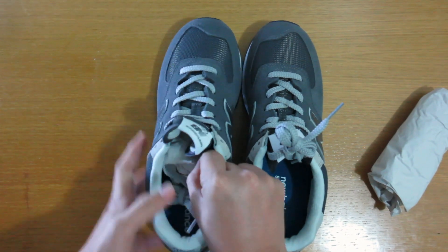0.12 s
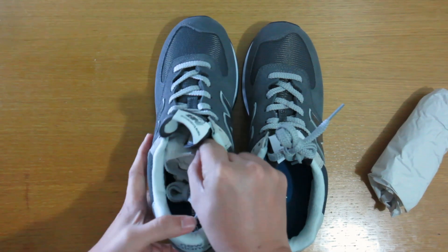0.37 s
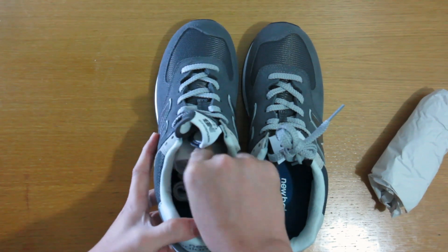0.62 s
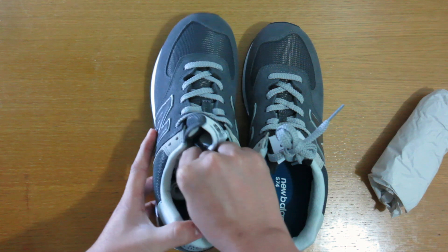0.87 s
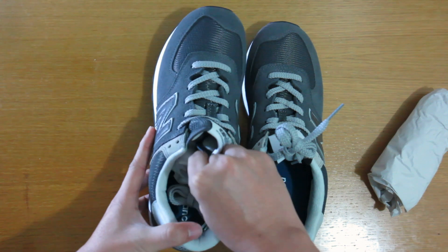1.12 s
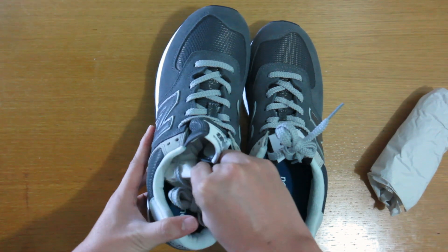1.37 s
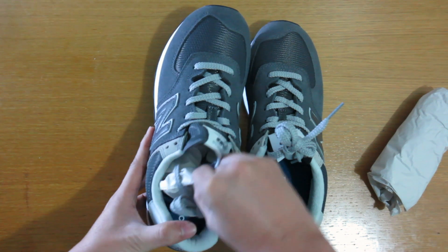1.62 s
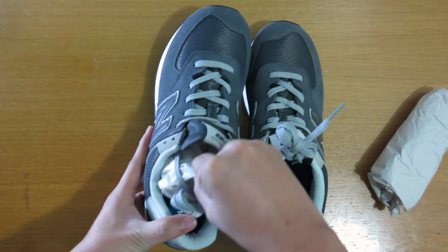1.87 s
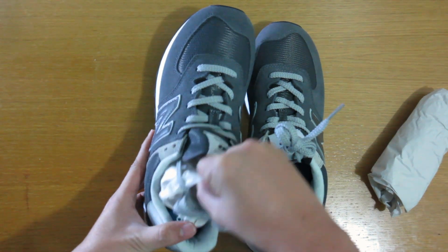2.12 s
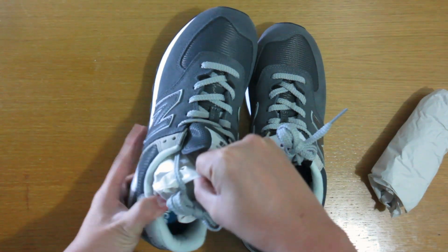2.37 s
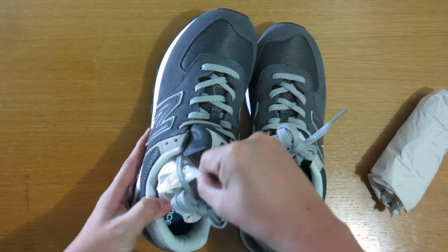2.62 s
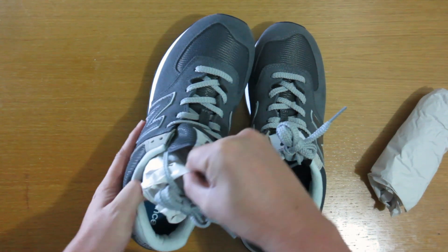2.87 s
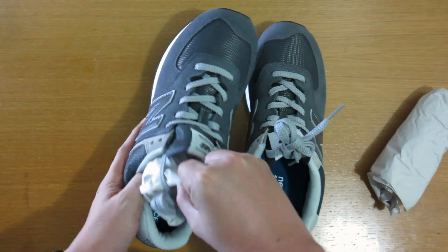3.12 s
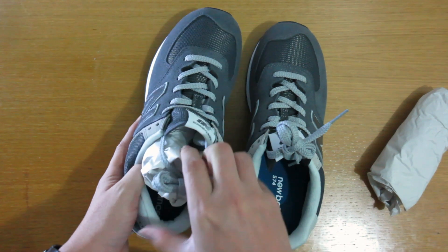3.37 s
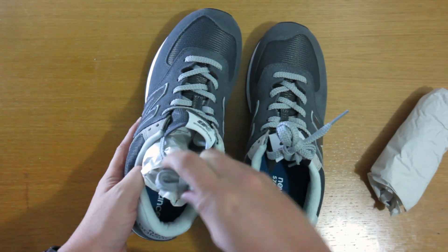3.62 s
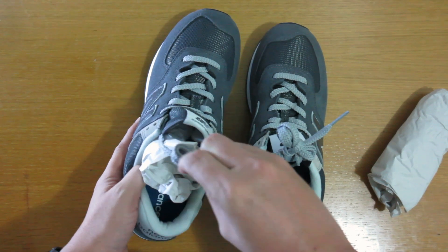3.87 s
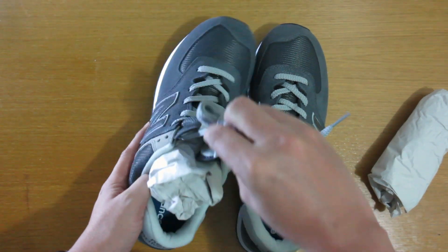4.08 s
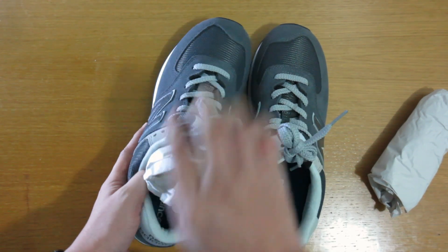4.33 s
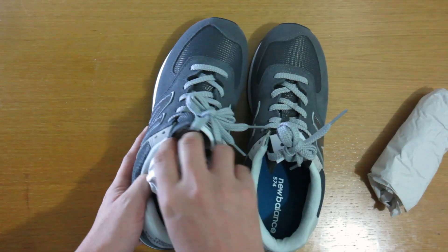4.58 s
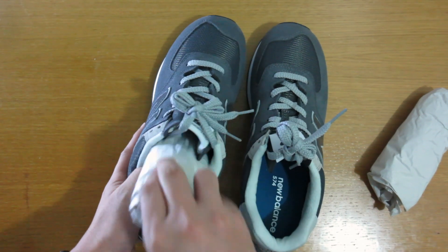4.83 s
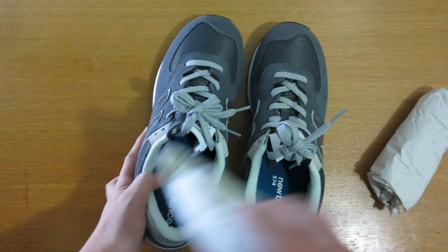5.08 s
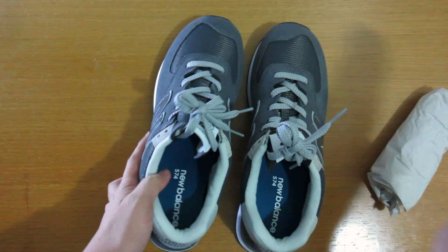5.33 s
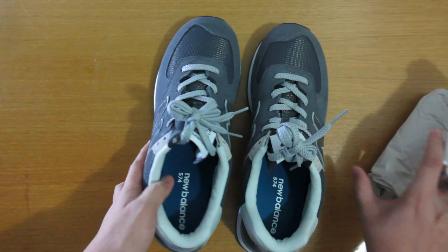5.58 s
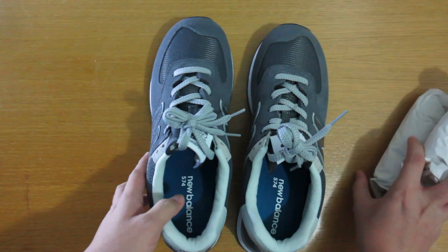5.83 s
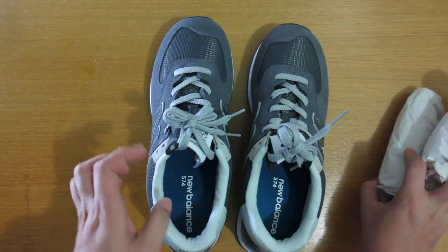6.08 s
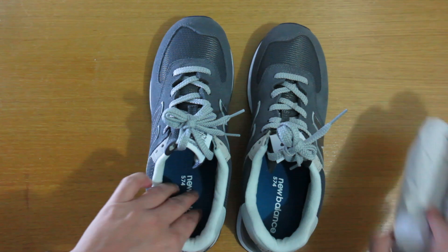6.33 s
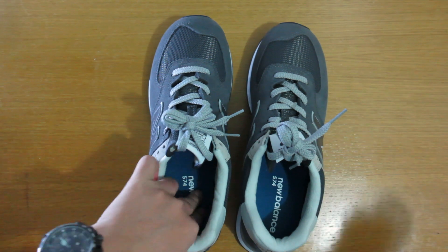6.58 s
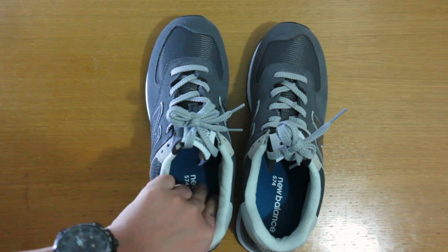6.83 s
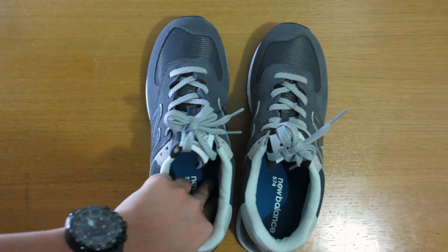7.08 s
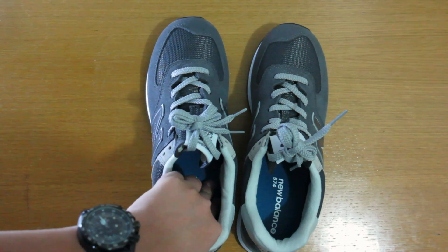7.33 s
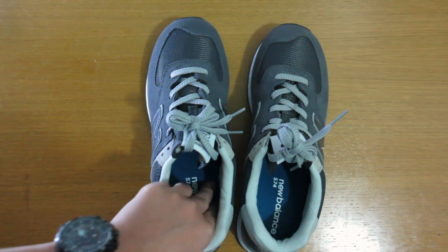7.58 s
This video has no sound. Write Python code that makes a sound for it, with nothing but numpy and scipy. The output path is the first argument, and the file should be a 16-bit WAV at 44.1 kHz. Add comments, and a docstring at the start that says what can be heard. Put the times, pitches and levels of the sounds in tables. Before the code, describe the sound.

Close, dry stereo sound in a small quiet room. It opens with faint rustles and tiny clicks; a dull pop comes at 0.4 s, and from about 0.5 s stiff paper crackles strongly inside a shoe. Until 3 s uneven tugs overlap, with bright snaps, a hollow papery tone and low scraping against the lining, strongest near 1.3 to 1.5 s and with a hard crunch at 2.76 s. Soft wooden thuds from the soles fall around 0.85, 1.8, 2.3 and 3.3 s. A big crinkle swells to 4.06 s, then a firmer knock at 4.25 s in a brief lull. Crisp crackling resumes from 4.6 to 5.5 s, and again lighter, drifting right, from 5.9 to 6.4 s. Small ticks near 6.8 s give way to near silence with faint low air, until a smoother brushing rustle and double thud arrive at 7.6 s.

```python
"""Crumpled paper is pulled out of shoes on a wooden table: its creases sound as many short damped sines over hiss.
The wad scrapes the lining as filtered noise, loud creases snap, stiff folds pop, and the soles excite
the decaying modes of the table top. A low hum, a short room answer and a faint air lie beneath.
Every sound returns weaker and inverted each 1/60 s; the two microphone ports ring at different pitches."""
import sys
import numpy as np
from scipy import signal
from scipy.fft import rfft, irfft, next_fast_len
from scipy.io import wavfile
from scipy.ndimage import uniform_filter1d, map_coordinates

SR = 44100
rng = np.random.default_rng(int(sys.argv[2]) if len(sys.argv) > 2 else 0)


def voltage_ratio(decibels):
    """Convert decibels (scalar or array-like) to amplitude ratios, 20 dB per decade."""
    exponent = np.asarray(decibels, float) / 20
    return 10 ** exponent


def transcribe(signal):
    """Save signal, clipped to [-1, 1], as a 16-bit WAV file at the path in sys.argv[1]."""
    frames = np.atleast_2d(signal).T
    limited = np.clip(frames, -1, 1)
    pcm = np.round(limited * 32767).astype(np.int16)
    wavfile.write(sys.argv[1], SR, pcm)


N = 339570  # length in samples

# Event levels are relative: each layer adds its own offset.
# each tug or squeeze of the wad: t/s of its height, rise/s, fall/s, crackle level/dB, shoe hollow level/dB re crackle
TUGS = [(.1, 0.073, 0.032, -41, -26), (.43, 0.032, 0.087, -37, -4), (.58, 0.15, 0.34, -22.5, -8.5),
        (.81, 0.12, 0.51, -23.5, -9), (1.27, 0.26, 0.53, -21, -6.5), (1.54, 0.13, 0.15, -21.5, -8.5),
        (1.65, 0.066, .12, -23, -7), (1.81, 0.36, 0.083, -23, -5.5), (1.93, 0.042, 0.51, -22.5, -7),
        (1.99, 0.11, 0.12, -21, -7), (2.21, 0.061, 0.14, -23.5, -8), (2.385, 0.04, 0.12, -27.5, -22),
        (2.46, 0.09, 0.21, -20, -14), (2.68, 0.095, 0.44, -43.5, -10.5), (2.77, 0.044, .1, -19.5, -9),
        (3.0, 0.015, 0.26, -29.5, -20), (3.11, 0.17, 0.032, -25.5, -11.5), (3.24, 0.021, 0.2, -25.5, -33),
        (3.3, 0.089, 0.36, -26.5, -7.5), (3.6, 0.12, 0.19, -24.5, -11.5), (3.78, 0.069, 0.6, -38.5, 0),
        (4.06, 0.28, 0.11, -17, -9), (4.585, 0.029, 0.2, -32, -12.5), (4.87, 0.31, 0.56, -19.5, -14),
        (5.03, 0.37, 0.16, -23, -5), (5.3, 0.31, 0.1, -22, -8), (5.48, 0.44, 0.13, -31.5, -9),
        (5.575, 0.012, 0.14, -39.5, -13), (5.73, 0.059, 0.081, -38.5, -7), (5.92, 0.14, 0.41, -33, -10),
        (6.07, 0.076, 0.65, -27, -16), (6.305, 0.014, 0.067, -22, -20), (6.41, 0.013, 0.028, -25.5, -12.5),
        (6.54, 0.02, 0.074, -44, -30), (6.79, 0.11, 0.25, -46.5, -20), (7.01, 0.02, 0.08, -53, -10),
        (7.05, 0.23, 0.89, -68, -11.5), (7.35, 0.029, 0.25, -36, -27.5), (7.44, 0.13, 0.23, -26, -10.5),
        (7.62, 0.069, 0.26, -17.5, -4)]
# the wad or hand shoving against lining and table: t/s of its height, rise/s, fall/s, deep level/dB,
# papery level/dB re deep
SHOVES = [(.02, 0.14, 0.183, -64, 11), (.222, 0.021, 0.074, -42, -0.5), (.336, 0.0156, .16, -40.5, -3.5),
          (.6, 0.1, 0.19, -40, 2.5), (.835, 0.03, 0.054, -30.5, -2), (.95, 0.12, 0.16, -39.5, -1.5),
          (1.09, .015, .15, -38.5, -1.5), (1.25, 0.22, 0.29, -27, -3.5), (1.48, 0.0063, 0.058, -25.5, 3),
          (1.64, 0.36, 0.14, -34, -3), (1.78, 0.038, 0.34, -30, -7.5), (1.99, 0.19, .2, -37.5, 2),
          (2.21, 0.098, 0.16, -36.5, -9.5), (2.46, 0.022, 0.097, -31, 2), (2.765, 0.032, 0.22, -37, -26),
          (3.09, 0.18, 0.095, -51.5, 1), (3.27, 0.039, 0.059, -44, -15), (3.43, .1, 0.057, -51, -22),
          (3.62, 0.086, 0.082, -40.5, 14.5), (3.92, 0.18, 0.36, -39.5, 12), (4.07, 0.092, 0.072, -26, 2),
          (4.25, 0.03, 0.2, -49, -35), (4.58, 0.014, 0.16, -44.5, 0.5), (4.87, 0.097, 0.22, -30.5, -0.5),
          (5.02, 0.41, 0.05, -32.5, 1), (5.3, 0.38, 0.13, -80, 33.5), (5.775, 0.045, 0.098, -39, -22),
          (5.92, 0.15, 0.44, -61.5, 25), (6.21, 0.026, 0.12, -55, 6.5), (6.305, 0.005, 0.22, -63, 18),
          (6.75, 0.64, 0.24, -69, 4), (6.908, 0.065, .055, -41.5, 4.5), (7.005, 0.031, 0.09, -48, 6.5),
          (7.3, 1, 0.83, -67.5, 3), (7.635, 0.038, 0.32, -22.5, 10.5)]
RISE_POWER, FALL_POWER = 1.69, 3.15  # exponents of the swell and of the fade
# crackle of the paper over its hiss; the bare hand on the lining only hisses: t/s, level/dB
CRISPNESS = [(0, 0), (1.2, -1.5), (2.1, -2), (4.2, -1), (5.0, -1.5), (6.0, 1.5), (7.0, -1), (7.3, -11)]
# fine fizz re crackle: t/s, level/dB
FIZZ_SHARE = [(0, -2.5), (.5, -14), (1.5, -15.5), (2.2, -13.5), (2.8, -10), (3.1, -17.5), (3.4, -6.5),
              (4.1, -12), (4.8, -13), (5.3, -9), (6, -9.5), (6.7, -5), (7.7, -7)]
# resonances of the shoe's air and upper: f/Hz, width/Hz, level/dB
SHOE_RESONANCES = [(410, 180, 8), (756, 159, 14.5), (1564, 440, 15), (2795, 320, 5.5), (3890, 640, 5.5),
                   (5310, 144, 6.5)]
# spectra of the paper's parts, relative: f/Hz, level/dB per Hz
CRACKLE_SPECTRUM = [(1700, -43.5), (2400, -3.5), (4200, -1.5), (5500, -2.5), (8000, -3.5), (10000, -58.5)]
HOLLOW_SPECTRUM = [(750, -20), (1050, 0), (2200, -5), (3000, -71)]
FIZZ_SPECTRUM = [(7000, -43.5), (8500, -2), (11000, -7), (13000, -19), (14500, -60), (16000, -100)]
DEEP_SPECTRUM = [(160, -3.5), (240, 2.5), (520, 3.5), (750, -34)]
PAPERY_SPECTRUM = [(400, -51), (570, 1), (1000, -1), (1400, -40)]
# creases that buckle loudly: t/s, level/dB, f/Hz, low part level/dB re the second column
SNAPS = [(0.008, -30.5, 6560, -19), (0.0926, -28.5, 4000, -44), (0.2101, -23, 2120, 10),
         (0.3273, -24.5, 2050, 9), (0.4172, -24.5, 2650, -22), (0.4987, -23.5, 6600, -32),
         (0.5617, -8, 3070, -29), (0.584, -13.5, 6630, -31), (0.642, -18, 5400, -12),
         (0.7822, -15.5, 1543, -8), (0.8162, -6, 4820, -32), (0.875, -16, 4260, -40),
         (1.002, -12.5, 5830, -32), (1.072, -12, 3980, -14), (1.09, -15, 4200, -29),
         (1.145, -13.5, 1640, -11), (1.208, -15.5, 6520, -25.5), (1.3511, -9.5, 5740, -24),
         (1.418, -15, 3850, -30), (1.4638, -16.5, 6200, -29.5), (1.4986, -20, 6500, -29.5),
         (1.777, -15, 1696, -15), (1.997, -9, 5500, -25), (1.908, -24, 1500, 2),
         (2.1796, -21.5, 4000, -23.5), (2.2018, -9.5, 2320, -15), (2.3532, -18, 5720, -30),
         (2.419, -5.5, 3675, -25), (2.5118, -13, 4540, -39), (2.619, -25, 6300, -38),
         (2.7626, -4.5, 5820, 11.5), (2.7828, -5, 6300, 3), (2.9772, -14, 3470, -33),
         (3.07, -6.5, 3845, -39.5), (3.2206, -23, 5580, -39), (3.2393, -16.5, 6230, -29.5),
         (3.418, -10.5, 4410, -8.5), (3.5356, -12, 6080, -33), (3.5794, -8.5, 1590, -6.5),
         (3.607, -7, 5680, -3.5), (3.7496, -15.5, 5500, -15), (3.778, -14.5, 2890, -30),
         (3.8073, -17.5, 4400, -40), (3.822, -12.5, 4140, -19), (3.8876, -11.5, 4300, -26),
         (3.9015, -6.5, 3770, -8.5), (4.039, -14, 5620, -16), (4.362, -38, 4760, 11),
         (4.5626, -30, 5810, -15), (4.581, -23, 4400, -15), (4.6629, -10, 4050, -22),
         (4.693, -12.5, 5700, -36), (4.7233, -11, 2500, -27), (4.7544, -13, 6260, -21),
         (4.8068, -12.5, 4320, -17), (4.877, -6.5, 3870, -13), (4.893, -15, 6380, -25),
         (5.0255, -9.5, 6530, -25), (5.0443, -11, 5800, -20), (5.1368, -17, 4880, -43),
         (5.1535, -10, 4890, -30), (5.2005, -16, 6230, -28), (5.236, -23, 3200, -33),
         (5.278, -17.5, 5140, -40), (5.2998, -10.5, 4840, -22), (5.3644, -20, 2110, -40),
         (5.379, -13.5, 5000, -42), (5.4298, -12, 6530, -40), (5.464, -27.5, 4870, -32),
         (5.4811, -11.5, 4870, -34), (5.5742, -18.5, 2850, -26), (5.633, -18, 1575, -35),
         (5.7, -24, 1630, -25), (5.716, -16, 5900, -20), (5.8743, -21, 3600, -27.5),
         (5.8943, -10, 3700, -25), (5.9193, -6.5, 3410, -43.5), (5.9763, -12, 6080, -40),
         (6.0252, -14, 6400, -22), (6.0557, -6.5, 3620, -41), (6.095, -11.5, 5520, -41),
         (6.1897, -14, 5050, -38.5), (6.224, -12, 3800, -20), (6.259, -14, 5670, -35.5),
         (6.306, -11.5, 6460, -33.5), (6.3065, -14, 724, -24), (6.3994, -11, 5360, -39),
         (6.5164, -30, 3460, -41), (6.5303, -25.5, 4760, -35), (6.549, -22, 5010, -21),
         (6.716, -36, 5100, -40), (6.726, -27.5, 3960, -42), (6.7402, -18.5, 5020, -37),
         (6.7832, -14, 5540, -40), (6.806, -24.5, 5470, -40), (6.823, -25.5, 5560, -40),
         (6.998, -34, 5100, 13), (7.3443, -34, 5120, -16)]
BURST_DB_PER_OCTAVE, FIZZ_DB_PER_OCTAVE = 2.5, 12  # higher snaps hiss and fizz more
# hard, dull folds that pop without hiss: t/s, level/dB, f/Hz, upper modes level/dB
POPS = [(0.4259, -12, 1780, 1.5), (0.125, -40.5, 2250, -15), (2.366, -15.5, 1650, -21),
        (2.601, -34, 2900, -20), (2.637, -30.5, 3750, -15), (2.732, -25, 3890, -9),
        (2.9359, -36, 3550, -14), (4.222, -44, 2925, -8), (4.333, -43, 2780, -12), (4.362, -39, 1897, 6.5),
        (4.54, -60, 2800, -8), (6.682, -41, 1420, -15)]
# upper modes of a pop: ratio to its f, level/dB, cycles to lose 60 dB
POP_MODES = [(1.3, -6, 21), (1.66, 1.5, 22), (2.8, -9, 19.5)]
# soles on the table: t/s, level/dB, upper modes level/dB
KNOCKS = [(0.838, -29, -13), (0.899, -32.5, -13), (0.958, -39, -20), (1.192, -34, 6.5), (1.822, -26, -6),
          (1.858, -27.5, -6), (2.293, -23.5, -13), (2.325, -28.5, -14), (2.37, -36, -15), (2.755, -70, -5),
          (3.258, -24.5, -8), (3.287, -19, -14), (3.34, -30, -8), (4.064, -32.5, 11.5), (4.178, -42, -21),
          (4.209, -31.5, -14.5), (4.246, -16.5, -1.5), (4.284, -21, -19), (4.342, -39, -9),
          (4.979, -40.5, 4), (5.511, -49.5, 3), (5.774, -37, 3.5), (6.889, -43, 10), (7.618, -23, 9),
          (7.651, -21, 8.5)]
# modes of the table top: f/Hz, level/dB, t60/s
TABLE_MODES = [(108.3, -4, 0.23), (131.1, -3, 0.29), (220, 3, 0.072), (281, -4.5, 0.089), (395, -12, 0.042)]
DETUNE = 0.028  # standard deviation, as a fraction of f: each contact loads the table a little differently
SETTLE_S = .068  # the sole comes to rest and smothers the ring
# the table's hum under the hands: t/s, level/dB
HUM_LEVEL = [(0.0, -60), (0.66, -58), (1.05, -55.5), (1.72, -49.5), (2.85, -73.5), (3.5, -55), (3.86, -68),
             (4.22, -72.5), (4.44, -75.5), (4.82, -70), (6.3, -68.5), (6.56, -61), (7.4, -59.5),
             (7.7, -48.5)]
# relative spectrum of the hum: f/Hz, level/dB per Hz
HUM_SPECTRUM = [(30, -50), (70, -11), (115, 11.5), (200, -17.5), (330, -89.5)]
# where the hands work: t/s, left minus right level/dB
HAND_PLACE = [(0, 3), (.6, 1.3), (2, 1.2), (4, 0), (5, 0.5), (5.7, -4.5), (6.3, -2), (6.7, -2.5),
              (7.1, -7.5), (7.5, -4)]
# left-right likeness of paper and room: f/Hz, likeness (0 to 1)
LIKENESS = [(150, 0.91), (600, 0.86), (1500, 0.98), (3000, 1), (6000, 0.56), (12000, .4)]
# decay of the walls' answer: f/Hz, t60/s
WALL_DECAY = [(200, 0.17), (2000, 0.075), (10000, 0.03)]
# relative spectrum of the faint air: f/Hz, level/dB per Hz
AIR_SPECTRUM = [(40, -24), (120, -1), (400, -2.5), (2000, -13), (8000, -29), (13000, -53), (16000, -80.5)]
# left-right likeness of the faint air: f/Hz, likeness (0 to 1)
AIR_LIKENESS = [(100, .8), (500, .4), (2000, 0.67), (8000, .4)]
AIR_FOLLOWS = 0.65  # dB of air per dB of hum
# inverted returns, in order: gain of each
RETURN_GAINS = [-.33, -.15, -.07, -.03]
RETURN_S = 1 / 60  # spacing of the returns
# air cavities of the microphone ports, left then right: f/Hz, width/Hz
PORTS = [(11400, 3390), (7195, 880)]
CEILING = .75  # full-scale fraction: the converter's soft top


def stirred_paper():
    """Superposition: clicking folds and crisp ticks over the hiss of paper on cloth, coloured by the shoe."""
    jerk_db = 1.53 * wobble(30) + 2.43 * wobble(130)
    folds = np.array([creases(jerk_db, count=5500, spread_db=5.0, cycles=11.0) for _ in range(2)])
    when, size = rng.random((550, 2)).T
    ticks = puffs((when * N).astype(int), 13 * size, t60=.011)
    crisp = voltage_ratio(curves(CRISPNESS)[0])
    hiss_envelope = 1.72 * unit(voltage_ratio(jerk_db))
    tick_envelope = 0.44 * crisp * unit(ticks)
    stir = crisp * folds + (hiss_envelope + tick_envelope) * rng.standard_normal((2, N))
    return filtered(shifting(spread(stir), depth_db=3.0), shoe_response)


def creases(clump_db, count, spread_db, cycles):
    """Impulsive buckling: tiny folds click in clumps, each a damped sine on its own pitch."""
    when, pitch, life = rng.random((count, 3)).T
    start = (when * N).astype(int)
    hz = 300 * (13000 / 300) ** pitch ** .6
    size_db = spread_db * np.clip(rng.standard_normal(count), -3, 2.3)
    gain = voltage_ratio(size_db + clump_db[start]) * np.sqrt(hz)
    return unit(rings(start, hz, cycles * (.5 + life), gain, size=200))


def shifting(x, depth_db):
    """Time-varying resonance: the wad's pockets change shape, so narrow bands rise and fade over tenths of a second."""
    z = signal.stft(x, nperseg=256)[2]
    field = rng.standard_normal(z.shape[1:])
    field = uniform_filter1d(field, size=2, axis=0)  # across frequency
    field = uniform_filter1d(field, size=35, axis=1)  # across time
    return signal.istft(z * voltage_ratio(depth_db * unit(field)), nperseg=256)[1][:, :N]


def shoe_response(f):
    """Parallel resonators: each band of the shoe's air and upper adds to the direct sound."""
    response = 1
    for centre, width, db in SHOE_RESONANCES:
        band = 1j * f * width / (centre * centre - f * f + 1j * f * width)
        response = response + (voltage_ratio(db) - 1) * band
    return response


def rustle(stir):
    """Amplitude modulation: each tug swells the crackle, the shoe's hollow tone and the fine fizz."""
    crackle, hollow = swells(TUGS)
    paper = crackle * voltage_ratio(-7.5) * coloured(stir, CRACKLE_SPECTRUM)
    paper += hollow * voltage_ratio(-2.5) * coloured(stir, HOLLOW_SPECTRUM)
    paper += crackle * voltage_ratio(curves(FIZZ_SHARE)[0] - 6) * coloured(stir, FIZZ_SPECTRUM)
    return paper


def scrape(stir):
    """Friction: each shove swells a deep and a papery band of the same stirring."""
    deep, papery = swells(SHOVES)
    body = deep * voltage_ratio(-2.5) * coloured(stir, DEEP_SPECTRUM)
    return body + papery * voltage_ratio(-6) * coloured(stir, PAPERY_SPECTRUM)


def snaps():
    """Buckling: a noise burst, a ring at the crease's pitch with chance neighbours, a dull thump of the wad."""
    s, db, hz, low_db = np.transpose(SNAPS)
    start = np.round(s * SR).astype(int)
    octaves = np.log2(hz / 4500)
    noise = spread(rng.standard_normal((2, N)))
    burst = puffs(start, db - 19 + BURST_DB_PER_OCTAVE * octaves, t60=0.019) * coloured(noise, CRACKLE_SPECTRUM)
    fizz = puffs(start, db - 23.5 + FIZZ_DB_PER_OCTAVE * octaves, t60=0.014) * coloured(noise, FIZZ_SPECTRUM)
    ring = rings(start, hz, np.full(len(s), 55.), voltage_ratio(db - 11.5), size=1600)
    late, pitch = rng.random((len(s), 2, 4)).transpose(1, 2, 0)
    neighbours, thump = 0, 0
    for d, p in zip(late, pitch):
        near_hz = hz * 2.52 ** (2 * p - .8)
        delayed = start + (100 * d).astype(int)
        neighbours = neighbours + rings(delayed, near_hz, np.full(len(s), 30.), voltage_ratio(db - 17.0), size=400)
        low_hz = 260 * 2.374 ** d
        thump = thump + rings(start, low_hz, np.full(len(s), 14.), voltage_ratio(db + low_db - 18.0), size=1400)
    return burst + fizz + ring + neighbours + thump


def pops():
    """Snap-through: a stiff fold flips over and excites a few short modes of the sheet."""
    s, db, hz, upper_db = np.transpose(POPS)
    start = np.round(s * SR).astype(int)
    pop = rings(start, hz, np.full(len(s), 22.), voltage_ratio(db), size=600)
    for ratio, level_db, cycles in POP_MODES:
        gain = voltage_ratio(db + upper_db + level_db)
        pop = pop + rings(start, hz * ratio, np.full(len(s), cycles), gain, size=600)
    return pop


def knocks():
    """Modal excitation: a rubber sole presses softly, so the table's modes swell over a few ms, then decay."""
    top, t = np.zeros(N + SR), np.arange(SR // 2) / SR
    hz, level_db, t60 = np.transpose(TABLE_MODES)[..., None]
    settle = np.exp(-(t / SETTLE_S) ** 4)
    press = 1 - np.exp(-(t / 0.0038) ** 2)
    for s, db, upper_db in KNOCKS:
        mode_db = db + level_db + upper_db * (hz > 170) + rng.standard_normal(hz.shape)
        decay = voltage_ratio(mode_db - 60 * t / t60)
        mode_hz = hz * (1 + DETUNE * rng.standard_normal(hz.shape))
        modes = decay * np.sin(2 * np.pi * mode_hz * t)
        top[round(s * SR):][:len(t)] += np.sum(modes, 0) * press * settle
    return voltage_ratio(2.5) * top[:N]


def table_hum():
    """Forced vibration: low-frequency noise follows the hands on the table."""
    return voltage_ratio(curves(HUM_LEVEL)[0]) * coloured(rng.standard_normal(N), HUM_SPECTRUM)


def room(x):
    """Reverberation: each frequency of the walls' answer dies at its own speed."""
    hz, t, z = signal.stft(rng.standard_normal((2, SR // 4)), SR, nperseg=256)
    decay = voltage_ratio(-60 * t / along(WALL_DECAY, hz)[:, None])
    tail = signal.istft(z * decay, SR, nperseg=256)[1]
    late = np.pad(x, (200, 0))[None]  # delay in samples
    return spread(signal.fftconvolve(late, tail / np.linalg.norm(tail[0]), axes=1)[:, :N])


def faint_air():
    """Stationary noise, shaped in frequency, whose level rises and sinks with the hum."""
    hum_db, = curves(HUM_LEVEL)
    gain = voltage_ratio(-67.0 + AIR_FOLLOWS * (hum_db - hum_db.mean()))
    return gain * coloured(spread(rng.standard_normal((2, N)), AIR_LIKENESS), AIR_SPECTRUM)


def rings(start, hz, cycles, gain, size):
    """Damped oscillation: sines, one a row, swell in about a cycle and lose 60 dB in so many cycles."""
    turns = np.arange(size) * hz[:, None] / SR
    decay = voltage_ratio(-60 * turns / cycles[:, None])
    wave = gain[:, None] * np.sin(2 * np.pi * turns) * decay * (1 - np.exp(-turns))
    wave = wave * np.hanning(2 * size)[size:]  # fades to silence at the row's end
    where = start[:, None] + np.arange(size)
    return np.bincount(where.ravel(), wave.ravel(), N + SR)[:N]


def puffs(start, db, t60):
    """Exponential decay: an envelope that jumps at each start and dies away."""
    t = np.arange(2000) / SR
    pulse = voltage_ratio(-60 * t / t60) * (1 - np.exp(-t / 0.00054))
    return signal.fftconvolve(np.bincount(start, voltage_ratio(db), N)[:N], pulse)[:N]


def swells(rows):
    """Power summation of movements that grow from rest and settle: gains of a layer and of its companion."""
    s, rise, fall, db, other_db = np.transpose(rows)[..., None]
    t = np.arange(0, N + 32, 32) / SR
    growing = np.clip(1 + (t - s) / rise, 0, 1) ** RISE_POWER
    settling = np.clip(1 - (t - s) / fall, 0, 1) ** FALL_POWER
    shape = np.where(t < s, growing, settling)
    sums = [np.linalg.norm(shape * voltage_ratio(d), axis=0) for d in (db, db + other_db)]
    return [np.interp(np.arange(N) / SR, t, total) for total in sums]


def spread(pair, likeness=LIKENESS):
    """Interchannel coherence: two streams mixed to left and right with a likeness set by frequency."""
    def mid_side(hz):
        angle = np.arccos(np.clip(along(likeness, hz), 0, 1)) / 2
        return np.array([np.cos(angle), np.sin(angle)])
    mid, side = filtered(pair, mid_side)
    return np.array([mid + side, mid - side])


def curves(rows):
    """Linear interpolation: one value per sample for each column after the time."""
    s, *cols = np.transpose(rows)
    return [np.interp(np.arange(N) / SR, s, c) for c in cols]


def wobble(rate):
    """Smooth random modulation, rate knots a second."""
    return map_coordinates(rng.standard_normal(N // 200), [np.arange(N) * rate / SR])


def along(points, hz):
    """Interpolation of (f/Hz, value) points on a logarithmic frequency axis."""
    f, v = np.transpose(points)
    return np.interp(np.log(hz + 1), np.log(f + 1), v)


def unit(x):
    """Normalisation to rms 1."""
    return x / np.sqrt(np.mean(x ** 2) + 1e-20)


def filtered(x, response):
    """Linear filtering: the spectrum of x times a complex response of frequency."""
    m = next_fast_len(N + SR // 2)
    return irfft(rfft(x, m) * response(np.fft.rfftfreq(m, 1 / SR)), m)[..., :N]


def coloured(x, spectrum):
    """Spectral shaping of x by a table of levels, at rms 1."""
    return unit(filtered(x, lambda hz: voltage_ratio(along(spectrum, hz))))


def scene():
    """Superposition of paper, knocks and hum, their room answer and a faint air."""
    stir = stirred_paper()
    hands = rustle(stir) + scrape(stir) + table_hum() + snaps() + pops()
    pan = voltage_ratio(np.outer([.5, -.5], curves(HAND_PLACE)[0]))
    near = hands * pan + knocks()
    return near + voltage_ratio(-13.0) * room(near.mean(0)) + faint_air()


def returns(hz):
    """Comb filtering: inverted, ever weaker copies at equal delays."""
    delays = [RETURN_S * (k + 1) for k in range(len(RETURN_GAINS))]
    return 1 + sum(g * np.exp(-2j * np.pi * hz * d) for g, d in zip(RETURN_GAINS, delays))


def bass_cut(hz):
    """Three cascaded first-order high-pass sections at 75 Hz."""
    return (1j * hz / (75 + 1j * hz)) ** 3


def ports(hz):
    """Cavity resonance: each port's air resonates and dulls what lies above."""
    return np.array([c * c / (c * c - hz * hz + 1j * hz * w) for c, w in PORTS])


def roll_off(x):
    """The treble ends steeply here."""
    return signal.sosfilt(signal.butter(12, 15690, fs=SR, output="sos"), x)


def record(dry):
    """Linear filtering by returns, bass cut and ports, then soft saturation that rounds off the peaks."""
    x = filtered(dry, lambda hz: returns(hz) * bass_cut(hz) * ports(hz))
    mix = x / (1 + (x / CEILING) ** 4) ** (1 / 4)
    return roll_off(mix)


dry = scene()
out = record(dry)
transcribe(out)
```